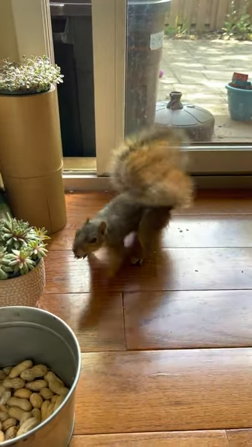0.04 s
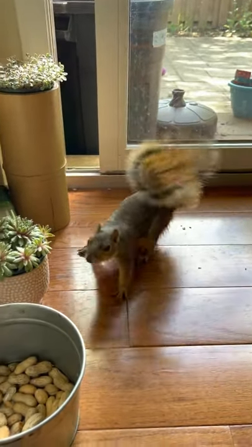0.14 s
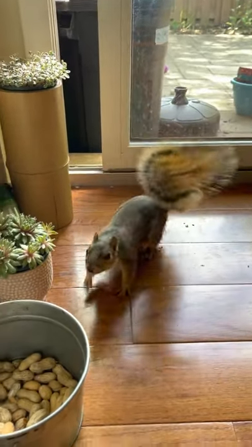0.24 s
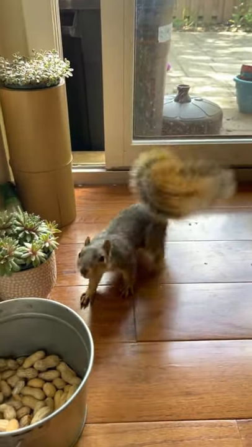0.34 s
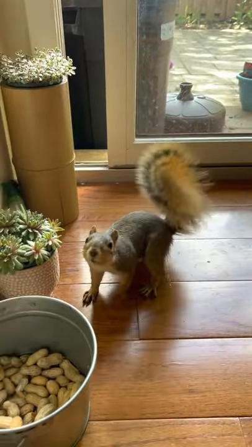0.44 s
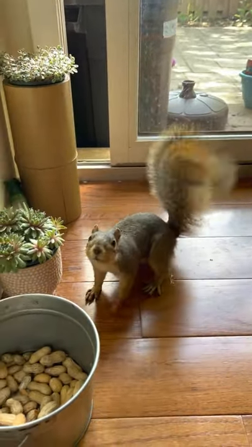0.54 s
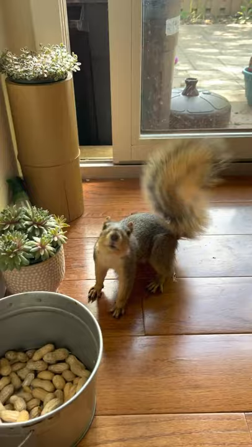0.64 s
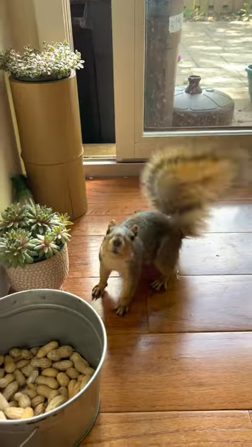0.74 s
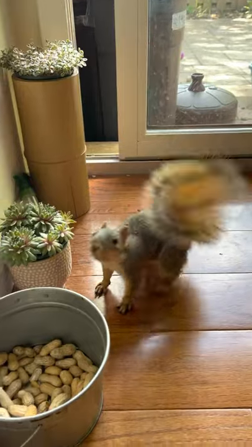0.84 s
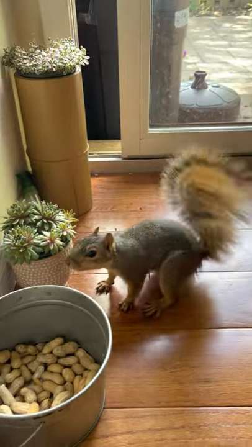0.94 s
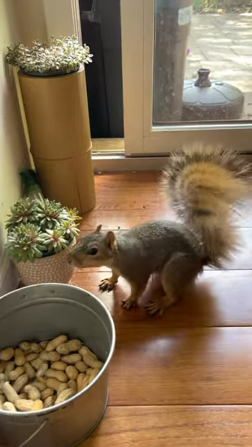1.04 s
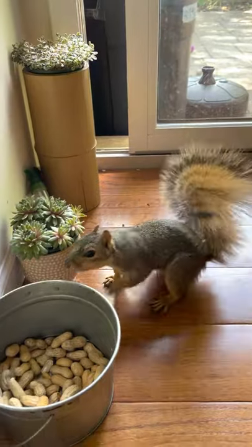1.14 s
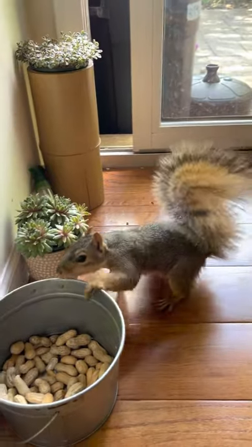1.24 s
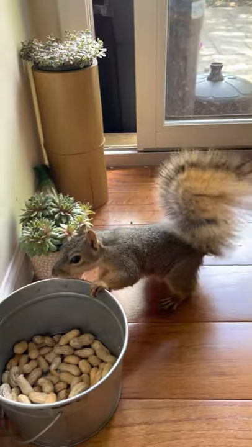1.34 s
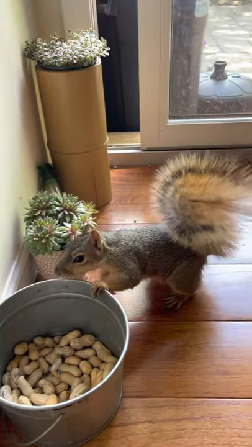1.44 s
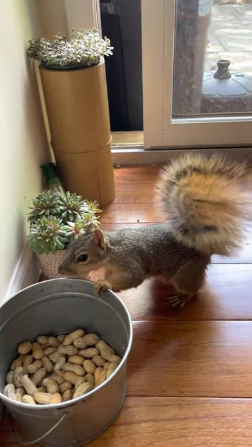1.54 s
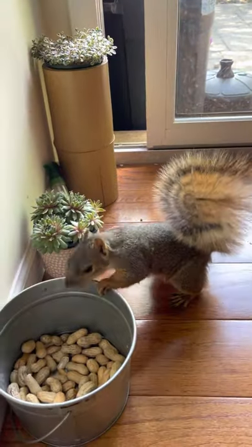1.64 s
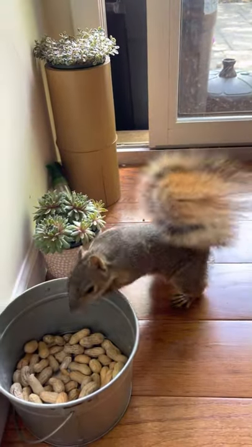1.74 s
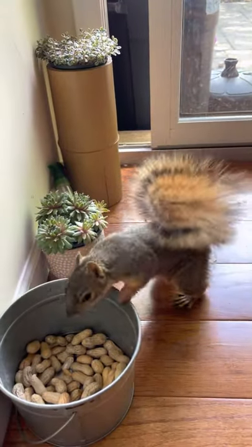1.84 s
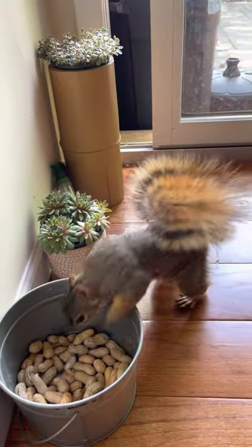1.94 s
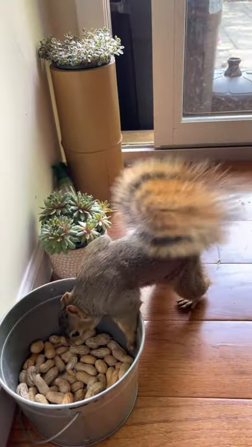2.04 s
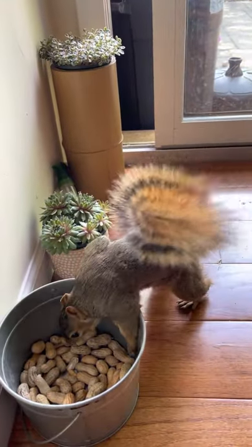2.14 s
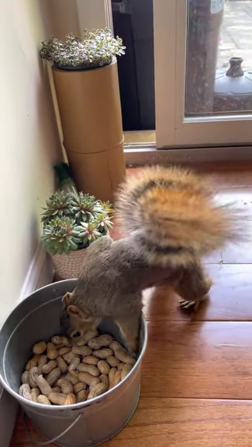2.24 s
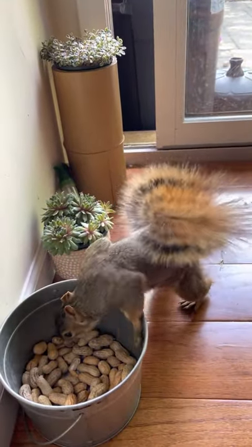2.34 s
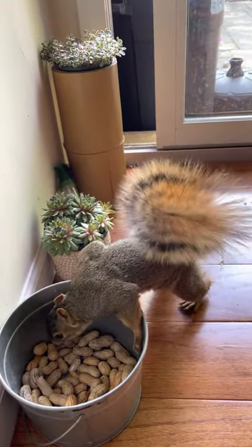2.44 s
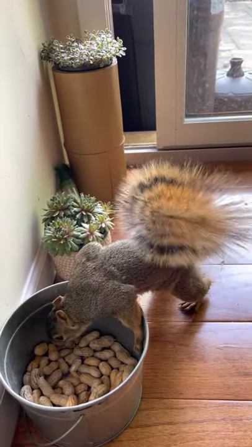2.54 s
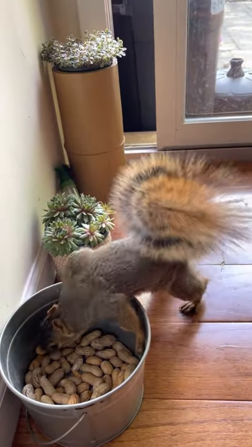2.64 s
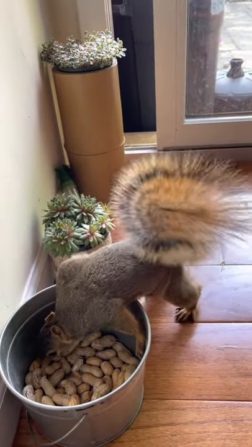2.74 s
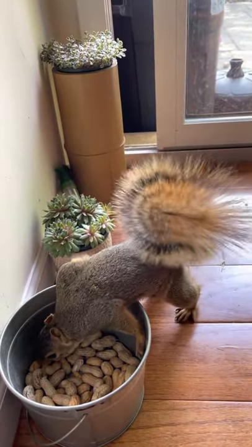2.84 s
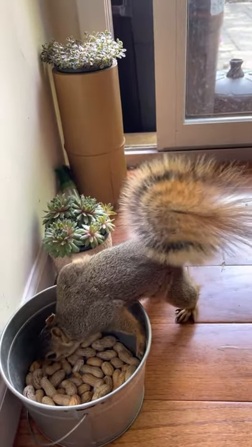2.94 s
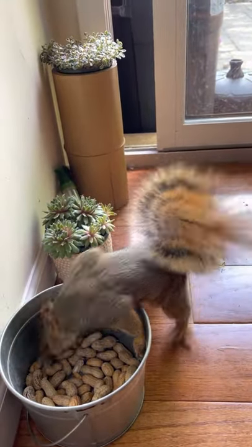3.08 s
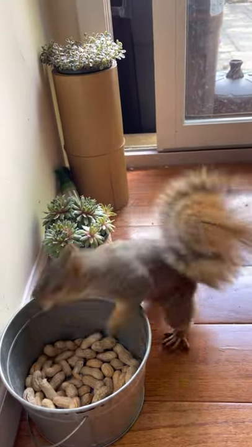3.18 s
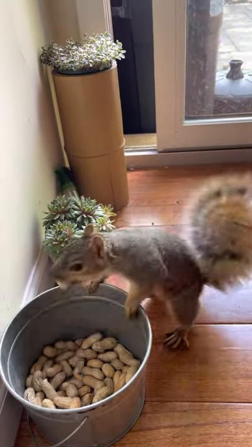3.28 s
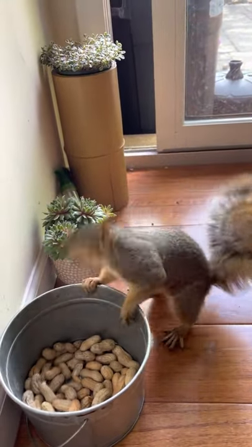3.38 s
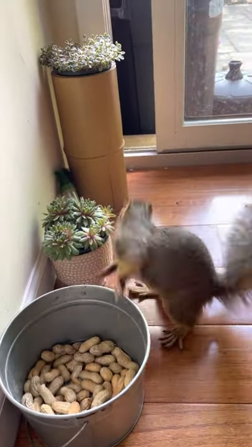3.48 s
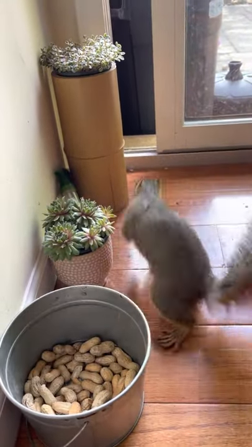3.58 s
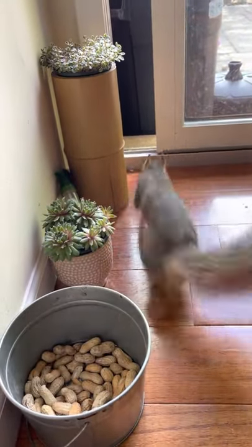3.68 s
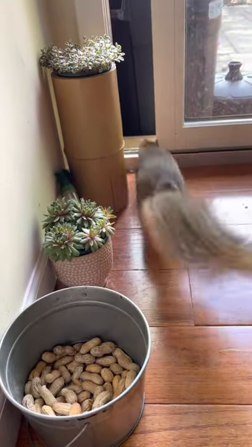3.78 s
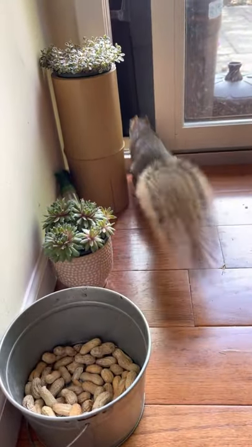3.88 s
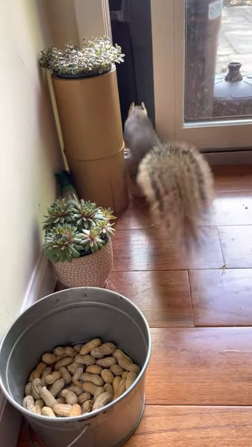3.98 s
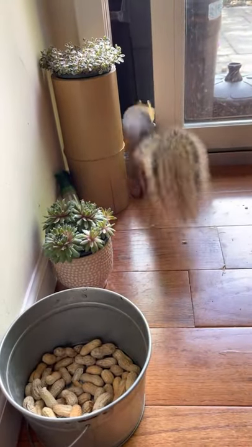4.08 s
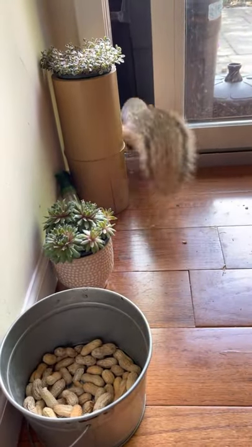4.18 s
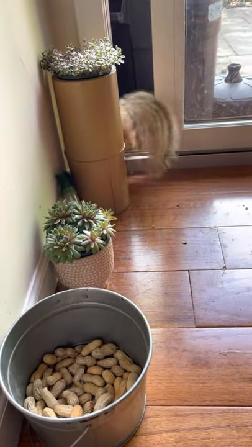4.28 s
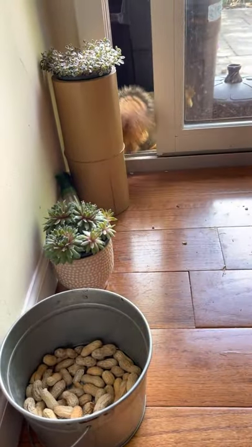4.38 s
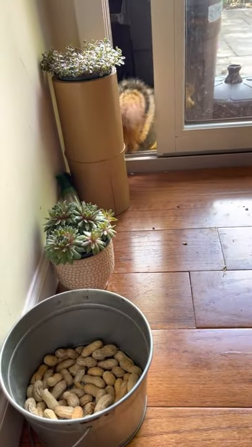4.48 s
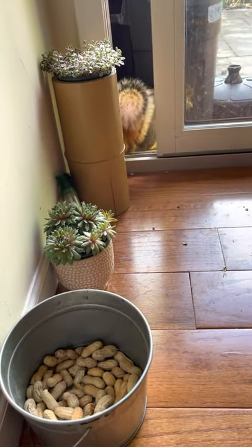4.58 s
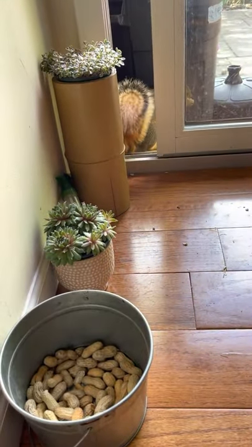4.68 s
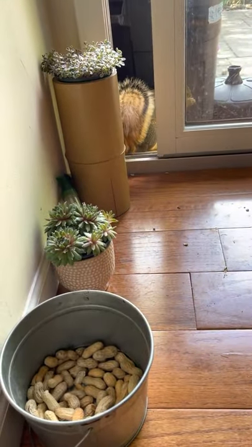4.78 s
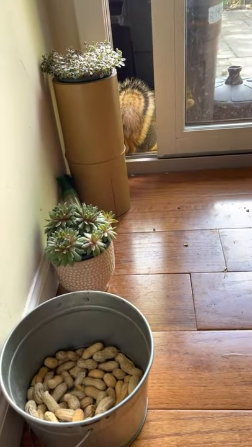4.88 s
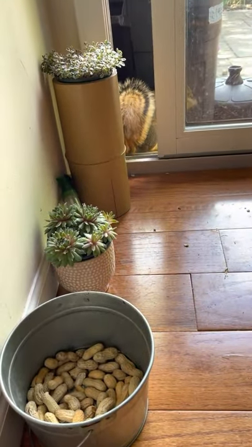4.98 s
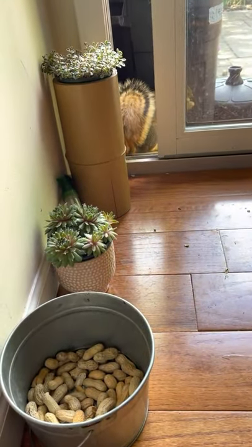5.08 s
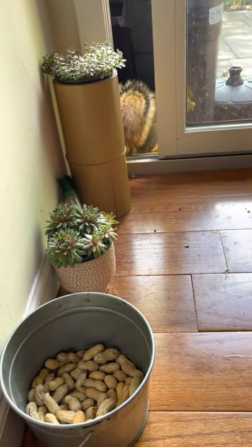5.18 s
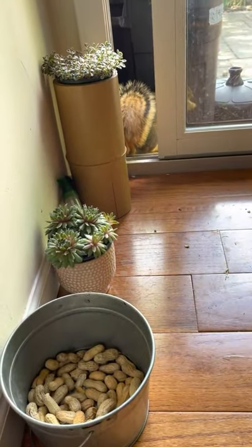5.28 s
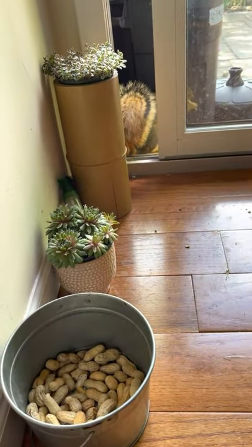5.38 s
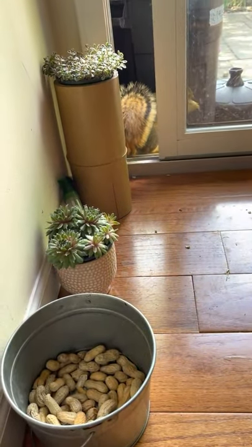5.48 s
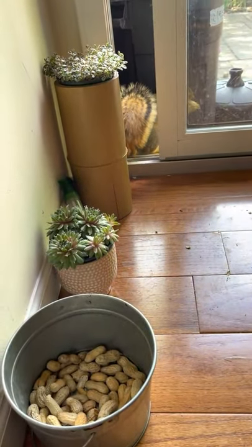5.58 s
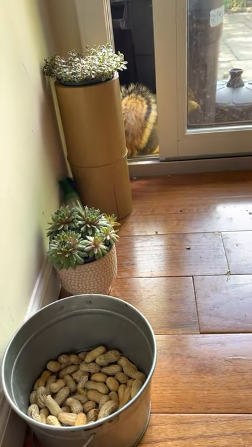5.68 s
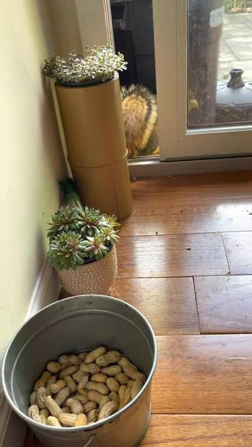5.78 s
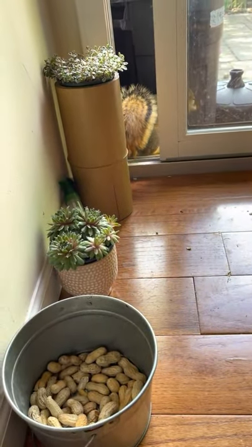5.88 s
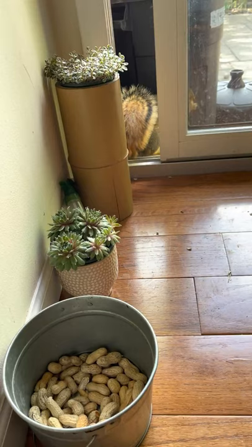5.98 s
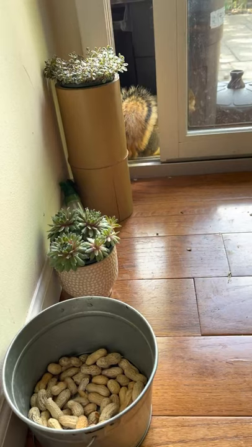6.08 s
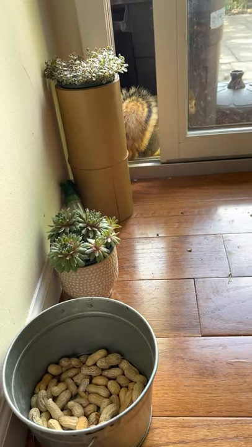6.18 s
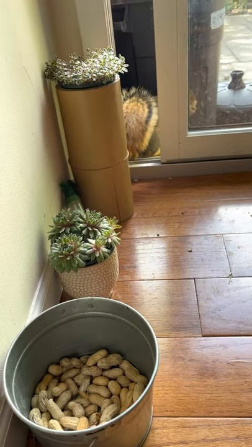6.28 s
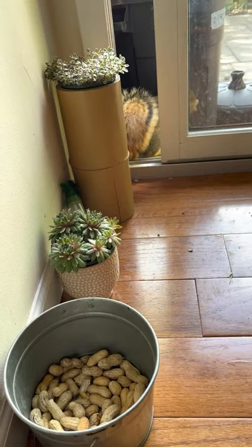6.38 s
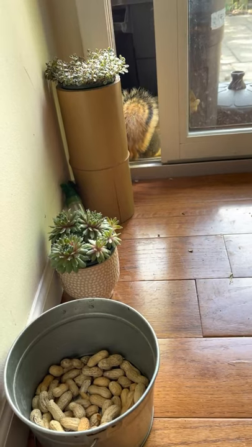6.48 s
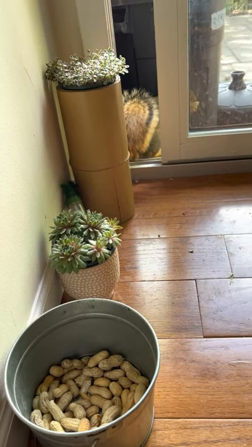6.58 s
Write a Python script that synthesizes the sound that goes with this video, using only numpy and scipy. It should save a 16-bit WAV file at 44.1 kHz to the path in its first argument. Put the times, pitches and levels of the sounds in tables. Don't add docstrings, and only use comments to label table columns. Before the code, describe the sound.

Close stereo pickup indoors: soft scuffing paw steps and small claw clicks on wooden boards, then dry gritty rummaging among peanuts in a metal bucket. A sharp shell crack, short rim rings and several boomy tin knocks peak around the middle. Light feet hurry off, a crisp crack sounds farther along, and the rest is almost still: low house rumble, appliance hum, thin leaf hiss and very faint birds outside.

```python
import sys
import numpy as np
from scipy import signal
from scipy.fft import rfft, irfft
from scipy.io import wavfile
from scipy.ndimage import uniform_filter1d

SR = 44100
rng = np.random.default_rng(int(sys.argv[2]) if len(sys.argv) > 2 else 0)


def nominal_scale(level):
    x = np.asarray(level, float) / 20
    return 10 ** x


def generate_wav(signal):
    frames = np.transpose(np.atleast_2d(signal))
    scaled = np.clip(frames, -1, 1) * 32767
    pcm = np.round(scaled).astype(np.int16)
    wavfile.write(sys.argv[1], SR, pcm)


N = 291942
T = np.arange(N) / SR
HZ = np.fft.rfftfreq(N, 1 / SR) + 1


def table(points):
    hz, value = np.transpose(points)
    return np.interp(np.log(HZ), np.log(hz), value)


def colour(x, points):
    inside = (HZ > points[0][0]) * (HZ < points[-1][0])
    gain = nominal_scale(table(points)) * inside
    return irfft(rfft(x) * gain / np.sqrt(np.mean(gain ** 2)), N)


def add(track, s, sound):
    i = int(s * SR)
    track[i:i + len(sound)] += sound[:N - i]


def walk(rate):
    hold = int(SR / rate)
    steps = np.repeat(rng.standard_normal(N // hold + 1), hold)
    x = uniform_filter1d(uniform_filter1d(steps, hold), hold)[:N]
    return x / x.std()


def resonance(x, hz, width_hz):
    return signal.lfilter(*signal.iirpeak(hz, hz / width_hz, fs=SR), x)


def double_resonance(x, hz, width_hz):
    return resonance(resonance(x, hz, width_hz), hz, width_hz)


def noise_burst(t, t60_s, attack_s):
    return rng.standard_normal(len(t)) * nominal_scale(-60 * t / t60_s) * np.minimum(t / attack_s, 1)


def ring(modes, contact_ms, tilt_db=0., scatter_db=0., late=0.):
    hz, db, t60 = np.transpose(modes)[:, :, None]
    t = T[:SR // 3]
    gain = nominal_scale(db + tilt_db * np.log2(hz / 500) + scatter_db * rng.standard_normal(hz.shape))
    build = (1 - np.exp(-t * hz / .25)) ** 2
    lag = late * np.log(hz / 920)
    waves = np.sin(2 * np.pi * (hz * t - lag))
    free = np.sum(gain * build * waves * nominal_scale(-60 * t / t60), axis=0)
    sound = np.convolve(free, np.hanning(int(contact_ms * SR / 1000) + 3))
    return sound / np.abs(sound).max()


def grit(spread_db):
    size_db = spread_db * np.minimum(rng.exponential(size=N), 6.5)
    x = rng.standard_normal(N) * nominal_scale(size_db)
    return x / x.std()


def stroke(length_s, sag_db, attack_s, release_t60_s):
    t = T[:int((attack_s + length_s + release_t60_s) * SR)] - attack_s
    sag = -sag_db * np.clip(t / length_s, 0, 1)
    release = -60 * np.maximum(t - length_s, 0) / release_t60_s
    return nominal_scale(sag + release) * np.clip(1 + t / attack_s, 0, 1) ** 2


def air():
    # frequency_hz, density_db (per Hz)
    rumble_spectrum = [(13, -39), (22, -23), (64, 2), (108, 3), (129, -4), (151, -5), (178, -17),
                       (204, -22), (230, -15), (300, -49.5), (510, -120)]
    hiss_spectrum = [(120, -19), (200, 4), (301, -5.5), (359, -9), (406, -8), (530, -8.5), (589, -12.5),
                     (769, -13.5), (1260, -25.5), (1800, -28), (2520, -39.5), (11100, -50.5),
                     (13800, -54.5)]
    rumble = nominal_scale(-48.5 + .7 * walk(2)) * colour(rng.standard_normal(N), rumble_spectrum)
    return rumble + nominal_scale(-56.5) * colour(rng.standard_normal(N), hiss_spectrum)


def fridge():
    # frequency_hz, level_db (rms)
    tones = [(118.4, -56.5), (355.3, -62), (473.7, -75.5), (532.9, -71), (646.0, -77.5), (775.2, -70.5),
             (1550, -88.5), (1771, -87.5)]
    out = np.zeros(N)
    for hz, db in tones:
        level = np.sqrt(2) * nominal_scale(db + 0.5 * walk(39))
        out += level * np.sin(2 * np.pi * (hz * T + rng.random()))
    return out


def shells(x, patchy_db, width):
    centres = np.geomspace(700, 13500, num=64)
    return sum(nominal_scale(patchy_db * walk(15)) * resonance(x, hz, width * hz) for hz in centres)


def scratching():
    # start_s, peak_db, dull_part_db, t60_s
    claws = [(0.049, -58.5, -4, .18), (0.1595, -67, -9, 0.3), (0.2404, -64, -1, 0.18),
             (0.4823, -59, -1, 0.19), (0.609, -51.5, -13, .064), (0.9164, -63, -14, 0.12),
             (0.985, -58, -4, 0.22), (1.0181, -59, -22, .096), (1.19, -48, -30, 0.024),
             (2.902, -58.5, -8, 0.089), (2.941, -48.5, 5, .031), (3.0579, -44.5, 5.5, 0.12),
             (3.079, -40, 4, .06), (3.7744, -63.5, 10, 0.061), (3.8, -60, -3, .15), (3.8327, -51, -3, .03),
             (3.905, -45.5, 1, 0.032), (3.9438, -52, -1, 0.12), (3.968, -58.5, 8, .1), (4.2016, -57, 1, .1),
             (4.272, -53.5, 4, 0.039), (4.7528, -73.5, 17.5, .088), (5.022, -64, 13, 0.064),
             (5.689, -71, 4, .062), (5.8294, -67, 3, 0.051), (6.1212, -76.5, 13, .07),
             (6.184, -68, 13, 0.13)]
    # start_s, peak_db, dull_part_db, shell_pitch_hz, shell_ring_db
    cracks = [
        (0.5113, -56, -13, 9800, 6),
        (1.323, -48.5, -18, 3740, 7.5),
        (1.3702, -27, -9.5, 7500, -3.5),
        (2.1323, -37.5, -13.5, 3360, -14.5),
        (2.419, -13.5, -21.5, 9580, -7),
        (3.1624, -49, -19, 3280, -10),
        (3.1673, -42, 2.5, 7500, 12),
        (3.5253, -47, -9, 4630, 11.5),
        (3.5747, -46.5, 6.5, 6500, -9),
        (4.362, -20.5, -11, 6980, -7),
    ]
    # start_s, length_s, level_db, sag_db (over the length), dull_part_db
    slides = [(0.518, .05, -73.5, 3.5, 2.5), (1.022, 0.024, -72.5, 16, 1), (1.33, 0.041, -63.5, 15.5, -3),
              (1.385, 0.021, -59.5, 4.5, -2.5), (1.47, .066, -53.5, 10.5, -9),
              (1.43, 0.023, -61, -2.5, -11), (3.466, 0.064, -52.5, 9, -9), (1.6, 0.15, -107, 5, 0),
              (3.53, 0.052, -57, 0.5, -12), (3.62, 0.036, -78, -1, 2), (4.291, 0.058, -79.5, -4, 6),
              (4.385, 0.074, -61.5, 6.5, 2)]
    # start_s, length_s, level_db, sag_db (over the length), dull_part_db
    rummage = [(1.787, 0.013, -67.5, 0, -7.5), (1.856, 0.015, -61, 5, -10), (1.918, 0.058, -73, -3, -5.5),
               (1.993, .01, -61, 3, -7), (2.041, .075, -61.5, 2, -8.5), (2.133, 0.097, -51, 4, -7.5),
               (2.294, 0.24, -73, 17.5, -7.5), (2.434, 0.059, -46, 8.5, -3.5),
               (2.528, 0.096, -47, 29.5, -11), (2.615, 0.087, -70.5, -15.5, -7.5),
               (2.722, .03, -47, -0.5, -19), (2.748, 0.17, -58, 13, -9.5), (2.915, 0.054, -58.5, 16.5, 0.5),
               (2.989, 0.054, -71.5, 4.5, 6), (3.076, 0.041, -54, -6.5, -7),
               (3.137, 0.083, -47.5, 7.5, -7.5), (3.252, .12, -66, -0.5, -2.5),
               (3.406, 0.041, -76.5, -19, -10)]
    # frequency_hz, density_db (per Hz)
    bright_spectrum = [(2940, -14), (5000, -10.5), (5700, -7), (6210, -5), (6480, -2.5), (8250, -1.5),
                       (9700, -0.5), (11400, -5), (12600, -26.5), (13800, -39)]
    dull_spectrum = [(500, -14), (1000, -1.5), (2000, 2.5), (2600, 3), (3500, 2), (4700, 1.5),
                     (6000, -11.5)]
    wall_spectrum = [(300, -6), (450, 5.5), (800, 8.5), (1200, -14.5), (2000, -16.5), (2600, -22)]

    bright, dull, wall, rung = np.zeros((4, N))
    t = T[:SR // 3]
    claw_hz, claw_ring_db, crack_t60_s = 3500, -7, 0.054
    ticks = [(s, db, dull_db, t60, claw_hz, claw_ring_db) for s, db, dull_db, t60 in claws]
    ticks += [(s, db, dull_db, crack_t60_s, hz, ring_db) for s, db, dull_db, hz, ring_db in cracks]
    snap_band = signal.butter(3, [8500, 12400], "band", fs=SR, output="sos")
    for s, db, dull_db, t60, hz, ring_db in ticks:
        fade = nominal_scale(db - 15.5 - 60 * t / max(t60, .005)) * np.minimum(t / .0012, 1)
        add(bright, s, fade)
        add(dull, s, fade * nominal_scale(dull_db))
        snap = nominal_scale(db - 12 - 60 * t[:400] / .004) * rng.standard_normal(400)
        add(rung, s, signal.sosfilt(snap_band, snap))
        shell = double_resonance(fade * rng.standard_normal(len(t)), hz, 500)
        add(rung, s, nominal_scale(ring_db + 18.0) * shell)

    jerky = nominal_scale(1.7 * walk(60))
    attack_s, release_t60_s = 0.017, 0.113
    for s, length_s, db, sag_db, dull_db in slides + rummage:
        push = nominal_scale(db) * stroke(length_s, sag_db, attack_s, release_t60_s)
        start = s - attack_s
        push = push * jerky[int(start * SR):][:len(push)]
        add(bright, start, push)
        add(dull, start, nominal_scale(dull_db) * push)
        add(wall, start, nominal_scale(-10.5) * push)

    gritty = colour(bright * grit(2.9), bright_spectrum) + colour(dull * grit(3.1), dull_spectrum)
    patchy = shells(gritty, 4.5, .03)
    through_wall = colour(wall * grit(3.2), wall_spectrum)
    return rung + through_wall + nominal_scale(-4) * patchy + nominal_scale(-12.5) * gritty


def paws():
    # start_s, peak_db, floor_boom_db,
    # dull_part_db, claw_part_db
    steps = [(0.068, -38.5, -50, -16, -9), (0.19, -41.5, -58, -9, -10), (0.26, -46.5, -58, 8.5, -10),
             (0.377, -38.5, -48, -2, -29), (0.497, -37.5, -38.5, 5.5, -19), (0.987, -48.5, -31, 15.5, -20),
             (1.02, -30.5, -37, -30, -8), (1.248, -58, -64, -11, -6), (1.321, -28, -39.5, 5, 0),
             (1.464, -34, -53, -23, -11), (2.433, -23, -68, -29, 4), (3.063, -38.5, -37, 9.5, -4),
             (3.445, -38.5, -47, 5.5, -1), (3.474, -44.5, -52, 10.5, -6), (3.635, -32.5, -37, 8.5, -35),
             (3.777, -38.5, -38.5, 9, 7), (3.881, -40, -67, 0, -14), (3.948, -46, -51, 18, -7),
             (4.408, -27.5, -41, 2, -2), (5.488, -62.5, -34.5, 3, -7)]
    out = np.zeros(N)
    t = T[:SR // 5]
    pad_attack_s = 0.00304
    pad = signal.butter(4, 2600, fs=SR, output="sos")
    for s, db, boom_db, dull_db, claw_db in steps:
        scuff = signal.sosfilt(pad, noise_burst(t, 0.078, pad_attack_s))
        board = double_resonance(scuff, 890, 420)
        knock = board / np.abs(board).max()
        knock = knock + nominal_scale(dull_db + 13.0) * resonance(scuff, 400, 330)
        knock = knock + nominal_scale(claw_db) * resonance(scuff, 1800, 1000)
        add(out, s - pad_attack_s, nominal_scale(db - 11) * knock)
        floor = ring([(110.6, -7.5, 0.055), (189, -22, 0.032)], 1.4)
        add(out, s + 0.004, nominal_scale(boom_db) * floor)
    return out


def leaves():
    # start_s, length_s, level_db, sag_db (over the length)
    gusts = [(0.63, .07, -78, 18), (1.086, 0.11, -80, -2), (1.594, .02, -77, 10), (3.99, .09, -71, 10),
             (4.17, .03, -86, 2), (4.492, 0.22, -64, 23), (4.757, .05, -71, 16), (4.95, .1, -88, -4),
             (5.057, 0.23, -82, 2), (5.447, 0.067, -77.5, -10), (5.532, 0.2, -70, 6), (5.75, 0.3, -84, -9),
             (6.12, 0.1, -71, 7), (6.24, 0.15, -82, -9), (6.479, .05, -73, 10), (6.563, .06, -80, 3)]
    attack_s, release_t60_s = 0.022, 0.13
    wind = np.zeros(N)
    for s, length_s, db, sag_db in gusts:
        add(wind, s - attack_s, nominal_scale(db - 8.5) * stroke(length_s, sag_db, attack_s, release_t60_s))
    leaf_spectrum = [(2000, -2), (3000, -2), (4500, -8.5), (6000, -62.0)]  # frequency_hz, density_db
    return wind * nominal_scale(2.0 * walk(25)) * colour(rng.standard_normal(N), leaf_spectrum)


def birds():
    # start_s, end_s, first_pitch_hz, last_pitch_hz, level_db
    calls = [(0.296, .42, 3600, 3800, -87), (1.1, 1.247, 4170, 4100, -82), (1.148, 1.298, 3300, 3130, -85),
             (3.999, 4.342, 3560, 3430, -87), (4.518, 4.62, 3370, 3300, -78),
             (4.913, 5.01, 3100, 2890, -79), (5.45, 5.555, 3800, 3880, -87),
             (5.458, 5.66, 3200, 2660, -79.5), (5.556, 5.758, 4150, 4020, -84.5),
             (5.81, 5.85, 4400, 4300, -83), (5.737, 6.064, 3136, 2900, -83), (6.1, 6.14, 3600, 3750, -75),
             (6.25, 6.378, 4310, 3500, -77.5), (6.298, 6.387, 3260, 3000, -80.5)]
    out = np.zeros(N)
    blur = walk(650)
    for s0, s1, hz0, hz1, db in calls:
        n = int((s1 - s0) * SR)
        glide = np.sin(2 * np.pi * np.cumsum(np.linspace(hz0, hz1, n)) / SR)
        add(out, s0, nominal_scale(db) * np.sqrt(np.hanning(n)) * blur[int(s0 * SR):][:n] * glide)
    return out


def pail_bumps():
    # start_s, peak_db, brightness_db (per octave), contact_ms
    bumps = [
        (1.3185, -35.5, 7, 0.94),
        (1.3699, -31, -1.5, 1),
        (1.4619, -31.5, -4, .9),
        (2.134, -41.5, -2, 1),
        (2.428, -29.5, -1.5, 1),
        (2.7670, -13.5, -0.5, 0.94),
        (2.9009, -35.5, 13, 0.69),
        (3.0884, -15, -1, 1),
        (3.1981, -9, -0.5, 0.54),
        (3.640, -32, -7.5, 1),
    ]
    # frequency_hz, level_db, t60_s
    wall_modes = [(105, -26, .2), (155, -21, .15), (286, -2, .08), (365, 1.5, .062), (430, -10, .055),
                  (485, -17, .11), (530, -13, .05), (590, -10, .035), (680, -6, .028), (730, 0, .024),
                  (815, -7, .08), (900, -7, .024), (1021, -21, .09), (1085, -22, .07), (1160, -24, .12),
                  (1238, -30, .12), (1403, -29, .09), (1980, -29, .07), (2306, -31, .1), (2670, -32, .1)]
    out = np.zeros(N)
    t = T[:SR // 4]
    for s, db, tilt_db, contact_ms in bumps:
        boom = ring(wall_modes, contact_ms, tilt_db, scatter_db=.7, late=2.44)
        add(out, s - .0007, nominal_scale(db) * boom)
        jolt = noise_burst(t, .1, .003)
        add(out, s, nominal_scale(db - 22.5) * double_resonance(jolt, 1700, 2430))
        settle = noise_burst(t, .19, .003)
        add(out, s, nominal_scale(db - 11) * double_resonance(settle, 410, 900))
    return out


def rim_pings():
    # start_s, peak_db
    pings = [
        (1.3193, -56),
        (2.128, -35),
        (2.425, -35.5),
        (3.1612, -37),
        (3.446, -61),
    ]
    # frequency_hz, level_db, t60_s
    rim_modes = [(711, -4, .13), (953, -12, .15), (1174, -2, .16), (1663, -5, .22), (1809, -6, .12),
                 (2175, -6, .16), (2306, -6, .12), (2471, -4, .17), (2702, -5, .2), (2789, -3, .12),
                 (3085, -7, .16), (3338, -3, .17), (3950, -8, .08), (4393, -14, .15)]
    out = np.zeros(N)
    crowd = [(hz, -12, .13) for hz in rng.uniform(600, 3600, size=36)]
    for s, db in pings:
        scrape = rng.standard_normal(600) * nominal_scale(-60 * T[:600] / .015)
        ping = signal.fftconvolve(ring(rim_modes + crowd, .1, -0.5, scatter_db=1.5), scrape)
        add(out, s, nominal_scale(db) * ping / np.abs(ping).max())
    return out


def room(x):
    t = T[:SR // 2]
    t60_s, dull_hz = 0.39, 5000
    tail = rng.standard_normal(len(t)) * nominal_scale(-60 * t / t60_s) * np.clip((t - .004) / 0.0011, 0, 1)
    tail = signal.lfilter(*signal.butter(1, dull_hz, fs=SR), tail)
    return nominal_scale(-15.5) * signal.fftconvolve(x, tail / np.sqrt(np.sum(tail ** 2)))[:N]


def scene():
    # frequency_hz, level_db (under the middle)
    spread = [(60, -46.5), (110, -45), (200, -21.5), (360, -8), (660, -4.5), (1200, -5), (2200, -8),
              (4000, -1.5), (5500, -4), (13000, -11.5)]
    near = scratching() + paws() + pail_bumps() + rim_pings()
    mid = near + room(near) + air() + fridge() + leaves() + birds()
    around = nominal_scale(-0.5) * room(near) + air() + fridge()
    side = irfft(rfft(around) * nominal_scale(table(spread)), N)
    return np.array([mid + side, mid - side])


def low_pass(x):
    return signal.sosfilt(signal.butter(12, 13940, fs=SR, output="sos"), x)


def record(dry):
    # frequency_hz, phase_rad
    left_phase = [(700, 1.1), (1250, -1.2), (1800, -0.13), (2500, -1.25), (3000, -0.45), (4700, -0.15),
                  (5500, -1.566), (6400, -1.63), (11600, -2.1), (13000, -2)]
    quarter_cycle = 1j * np.tan(np.clip(table(left_phase), -2.8, 0) / 2)
    lagging = irfft(rfft(dry.mean(axis=0)) * quarter_cycle, N)
    return low_pass(dry + np.array([lagging, -lagging]))


dry = scene()
out = record(dry)
generate_wav(out)
```